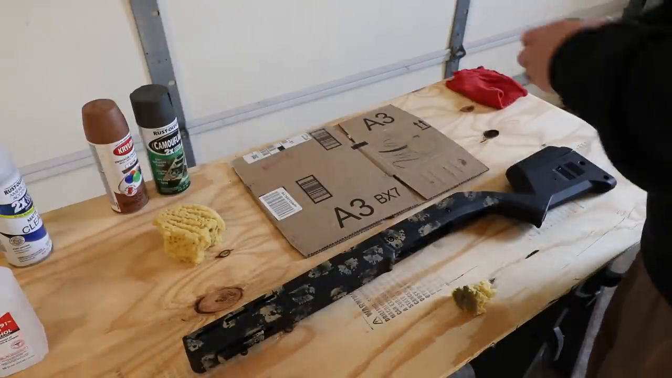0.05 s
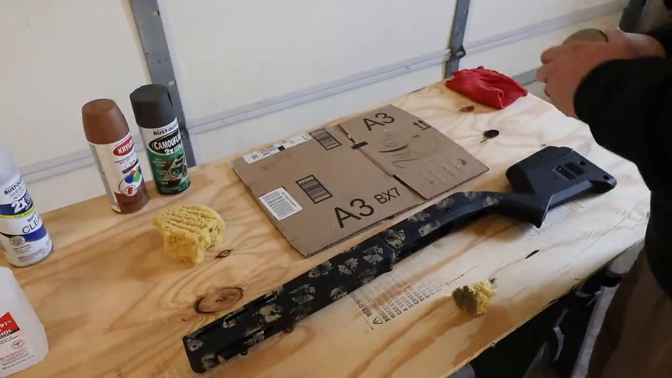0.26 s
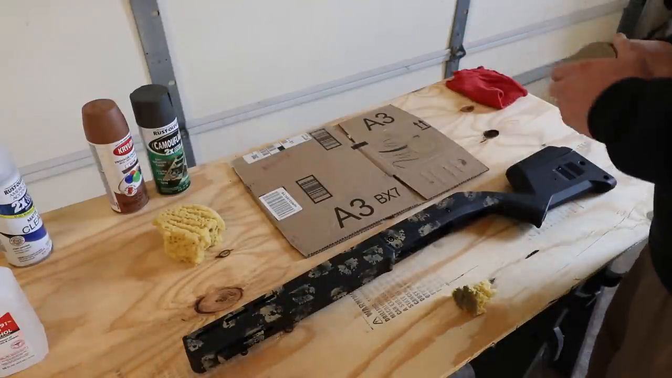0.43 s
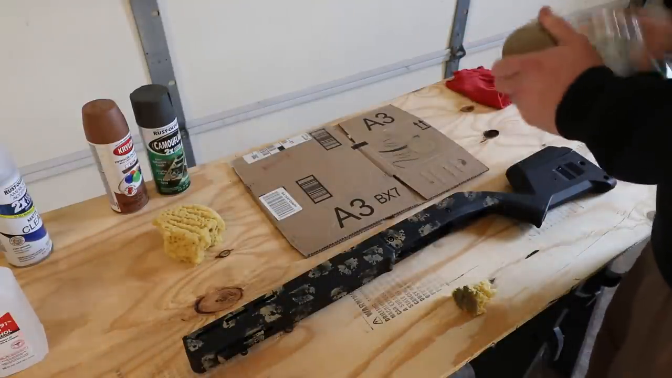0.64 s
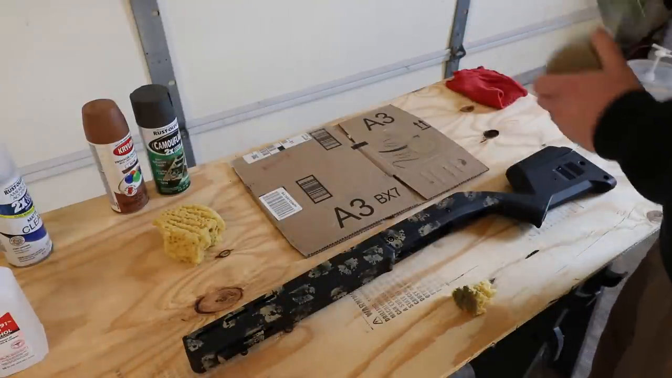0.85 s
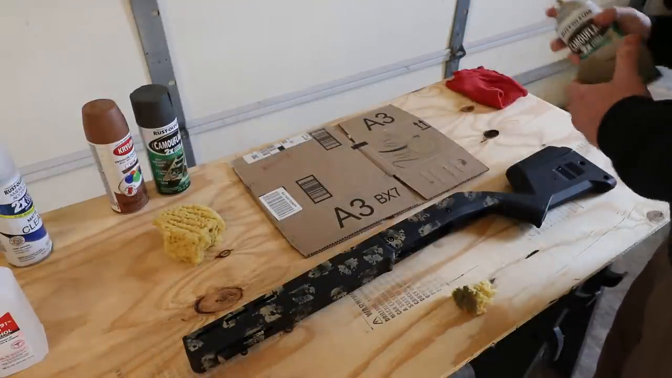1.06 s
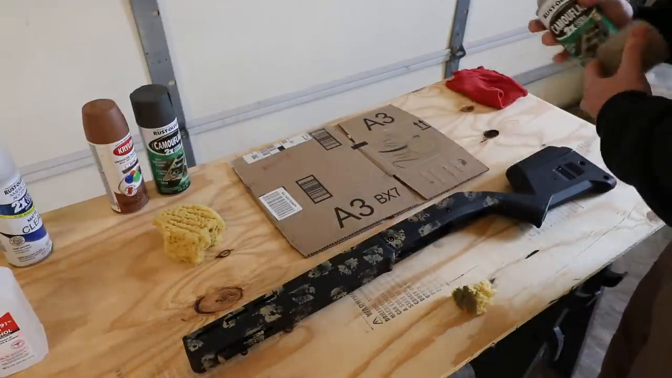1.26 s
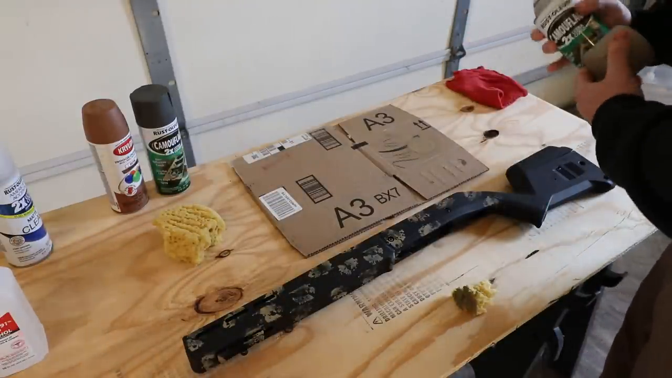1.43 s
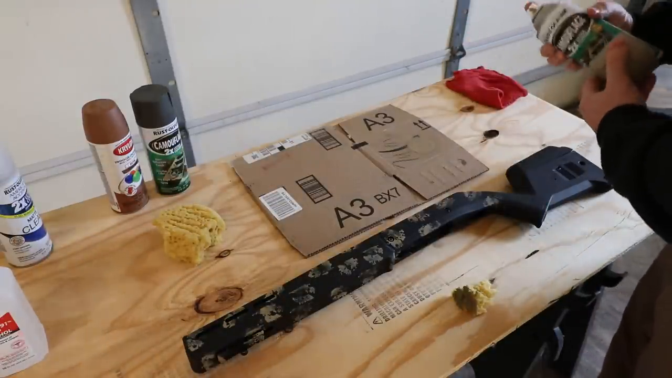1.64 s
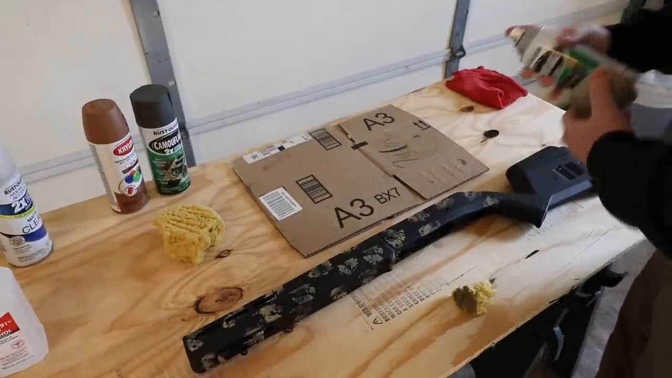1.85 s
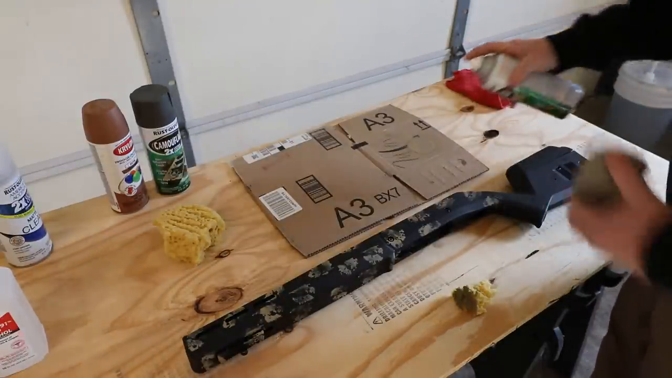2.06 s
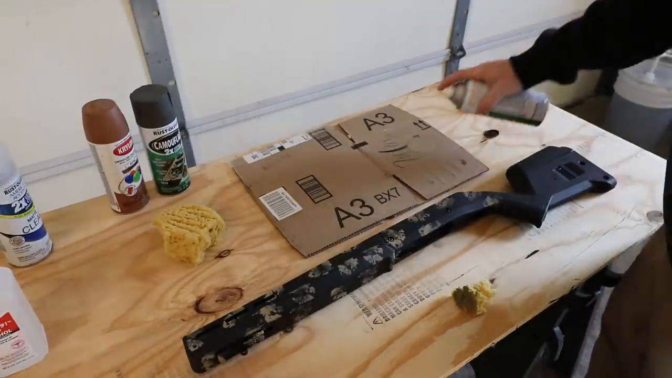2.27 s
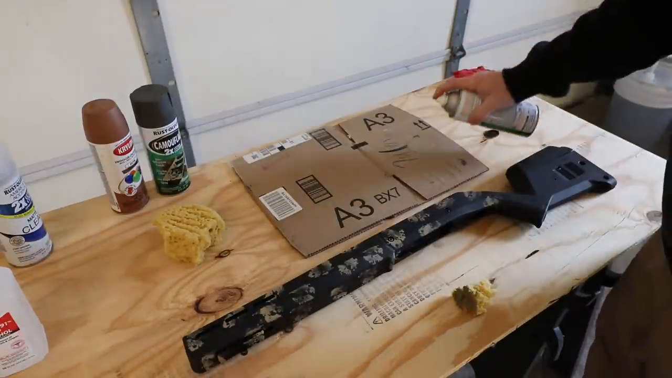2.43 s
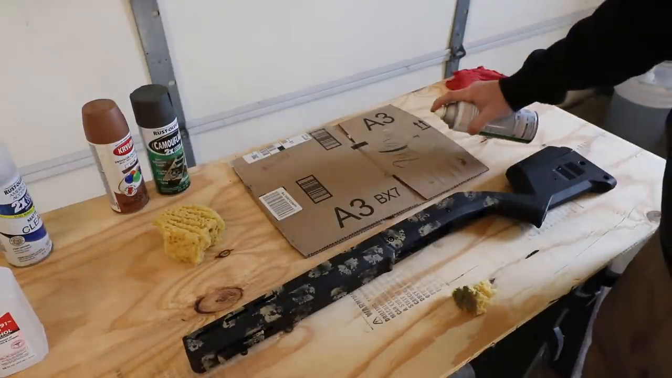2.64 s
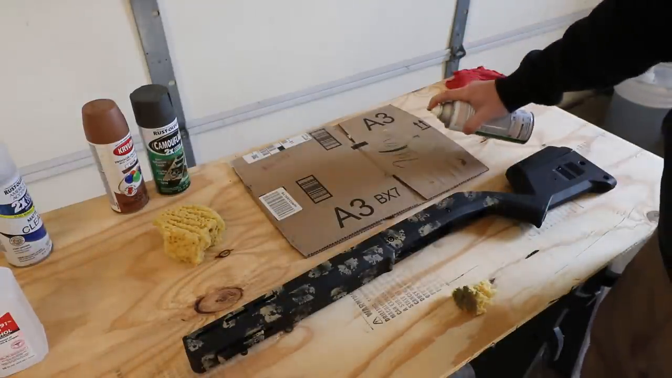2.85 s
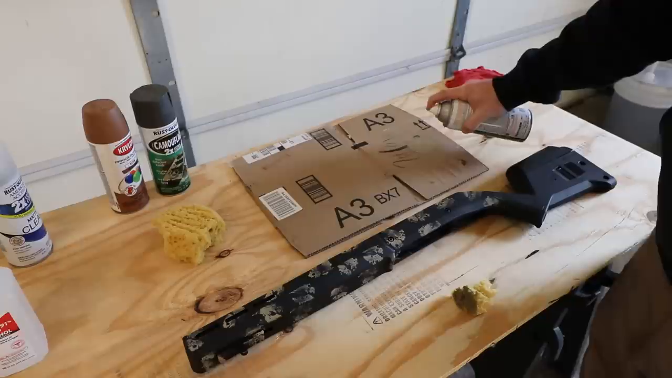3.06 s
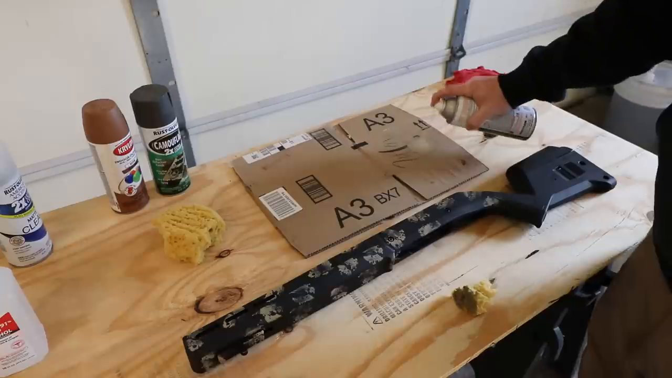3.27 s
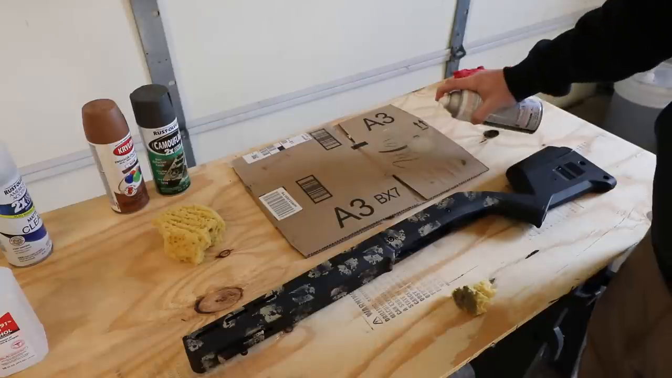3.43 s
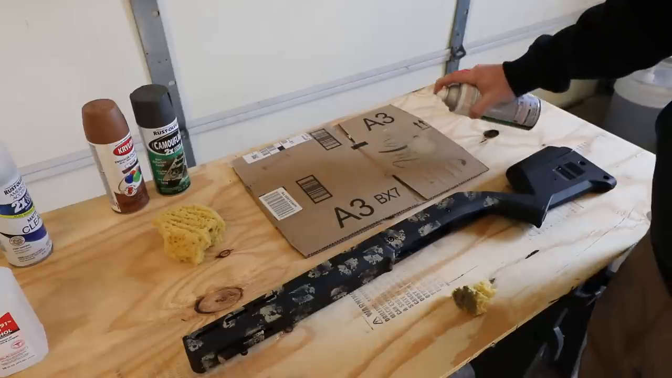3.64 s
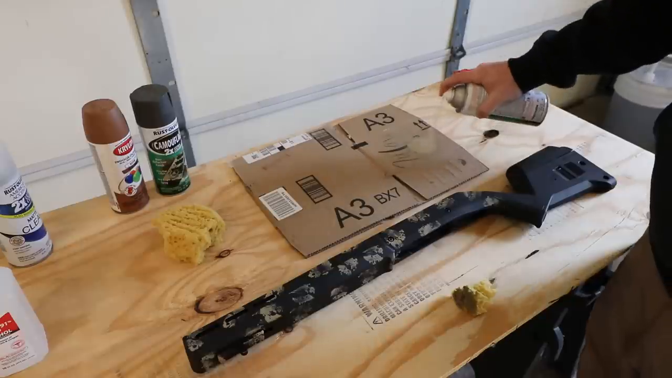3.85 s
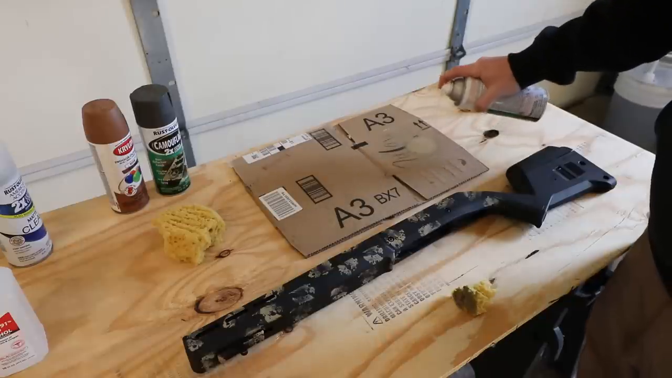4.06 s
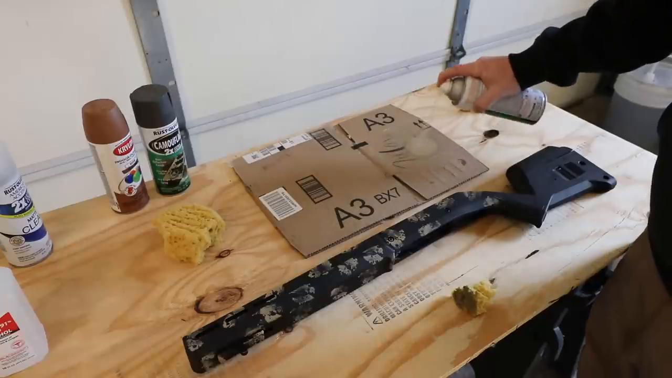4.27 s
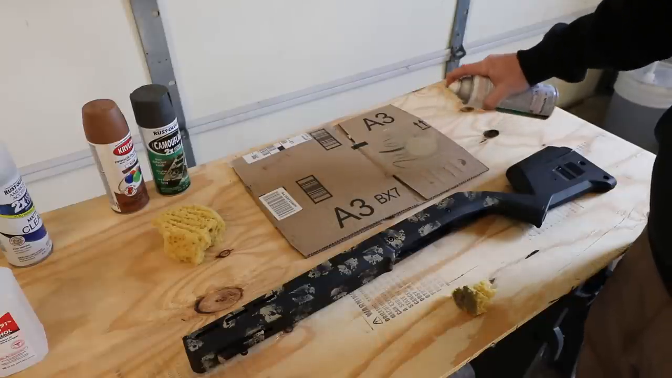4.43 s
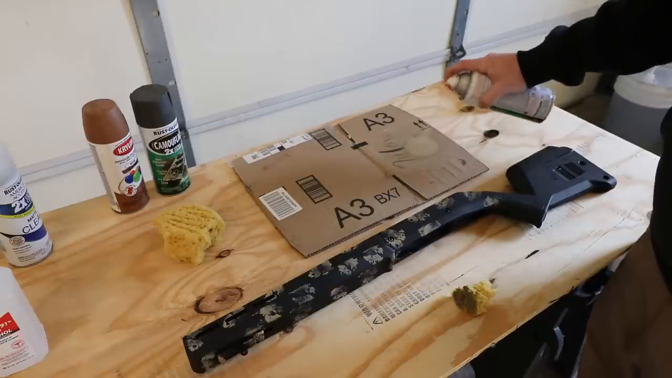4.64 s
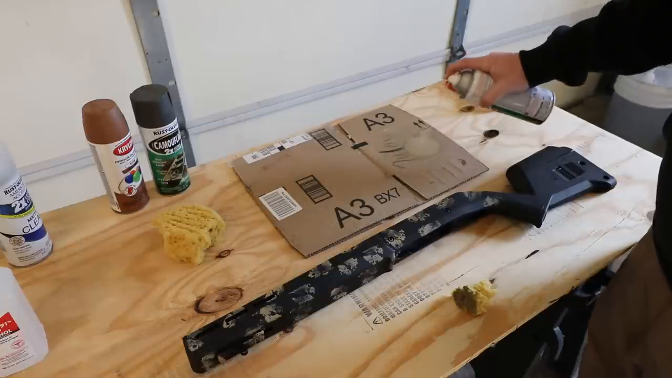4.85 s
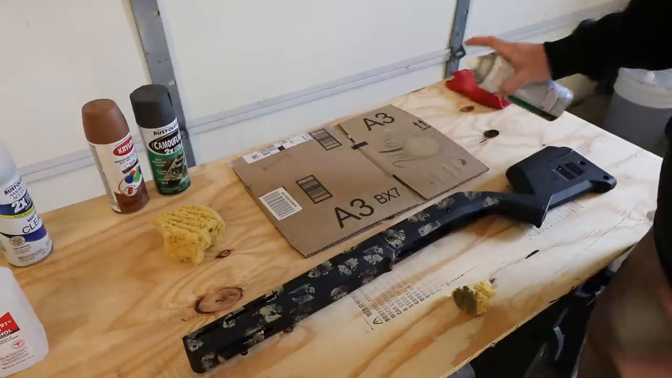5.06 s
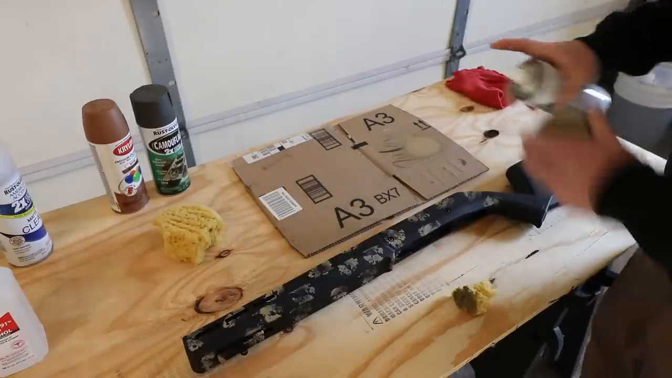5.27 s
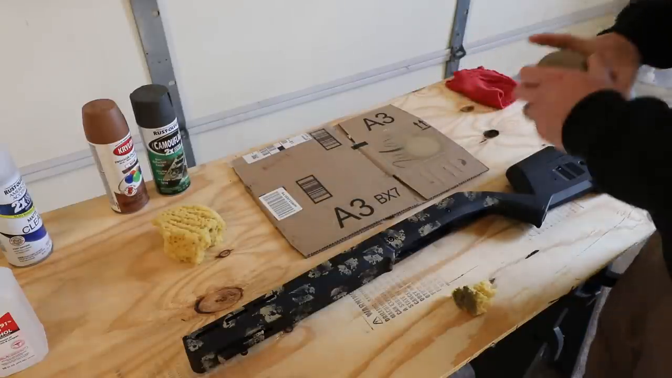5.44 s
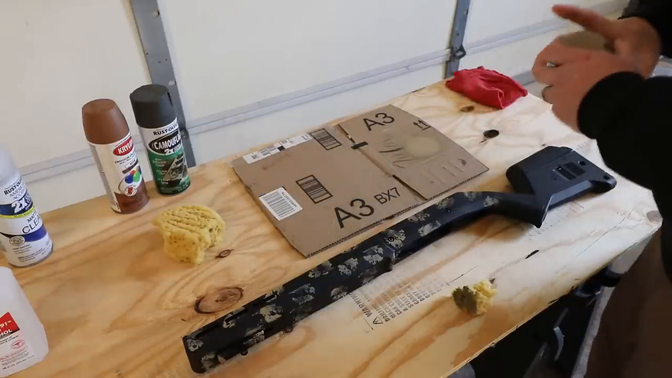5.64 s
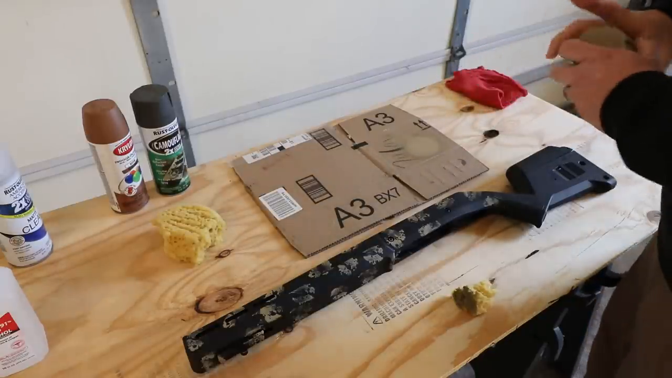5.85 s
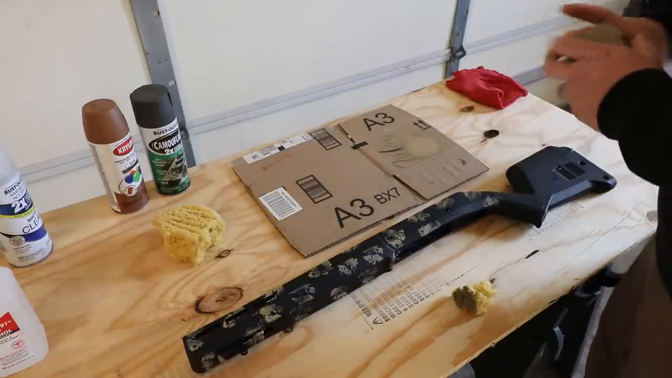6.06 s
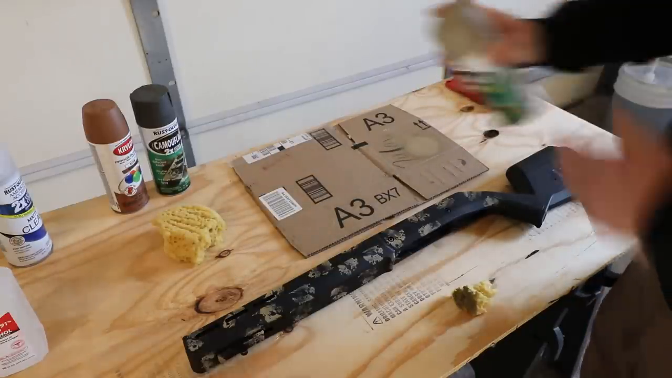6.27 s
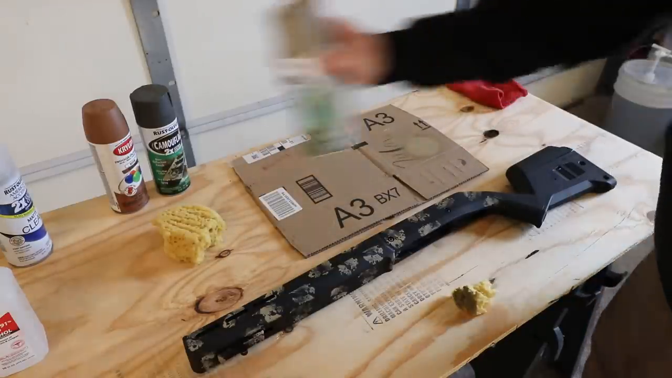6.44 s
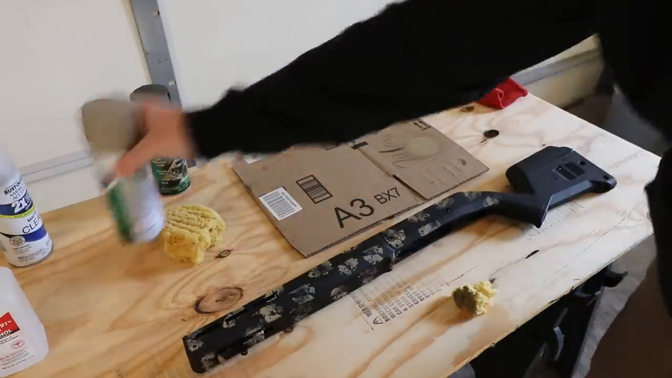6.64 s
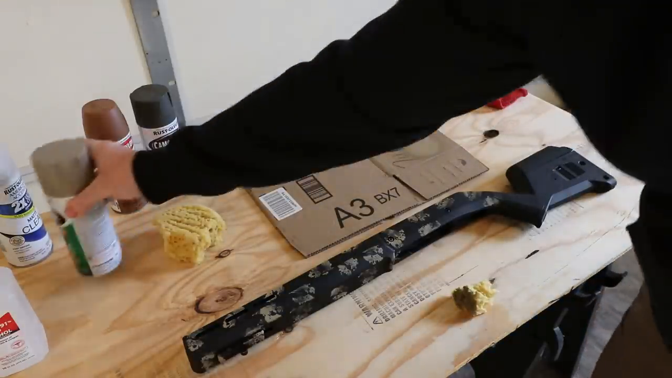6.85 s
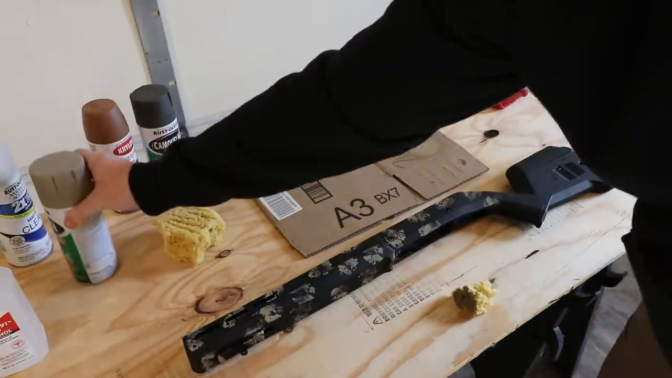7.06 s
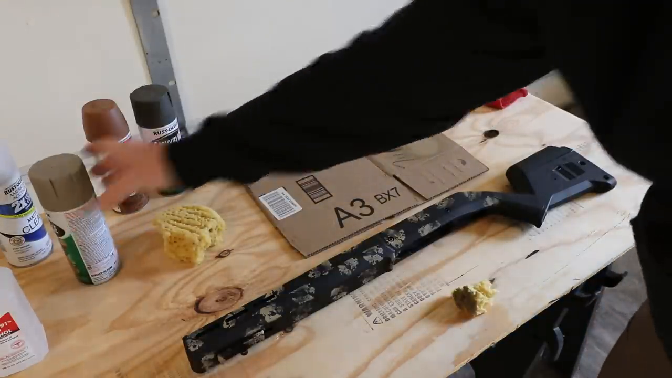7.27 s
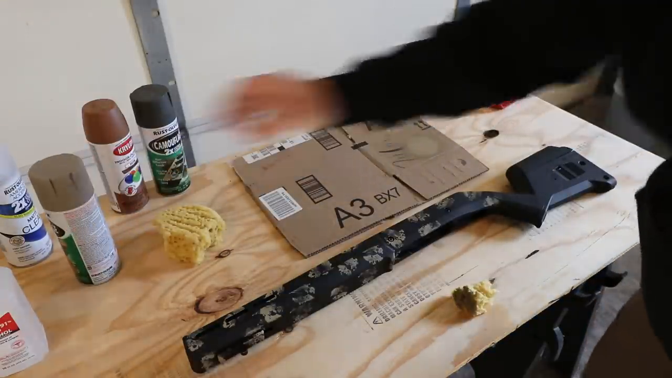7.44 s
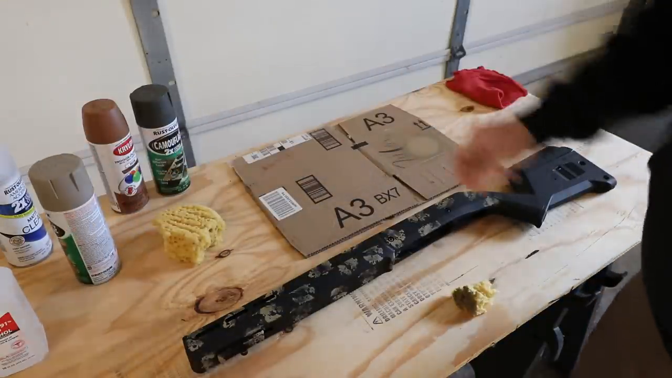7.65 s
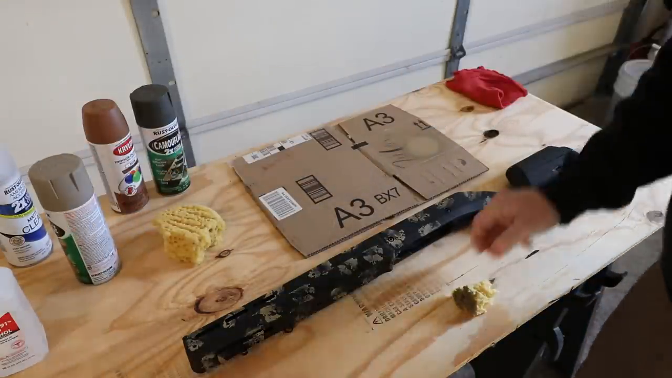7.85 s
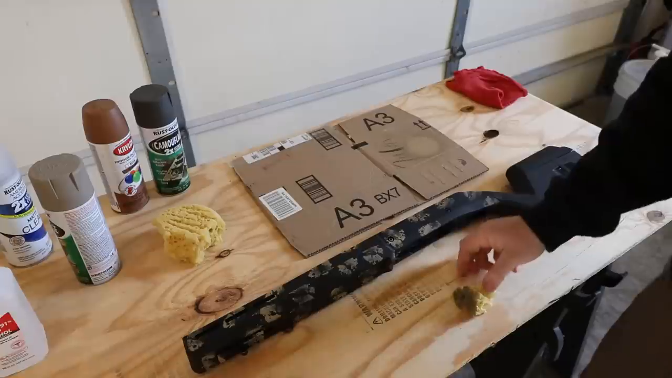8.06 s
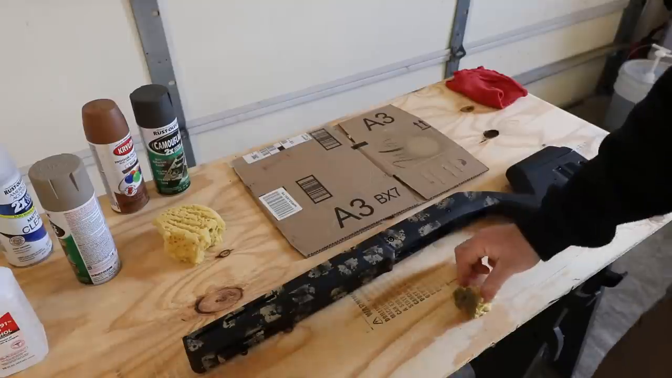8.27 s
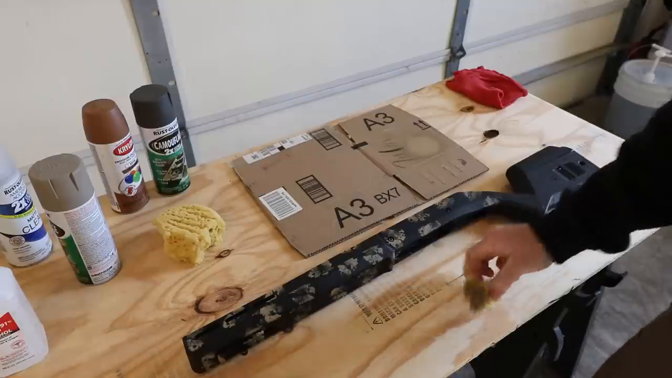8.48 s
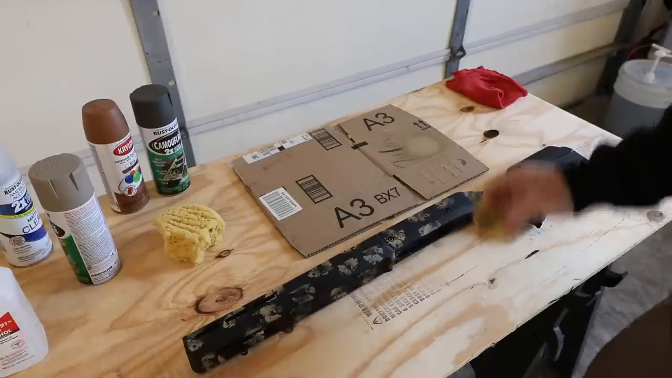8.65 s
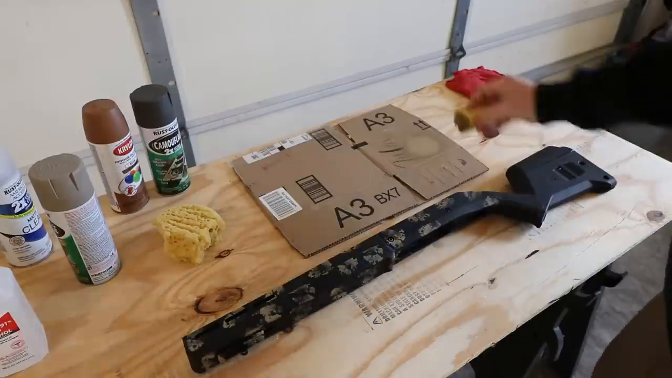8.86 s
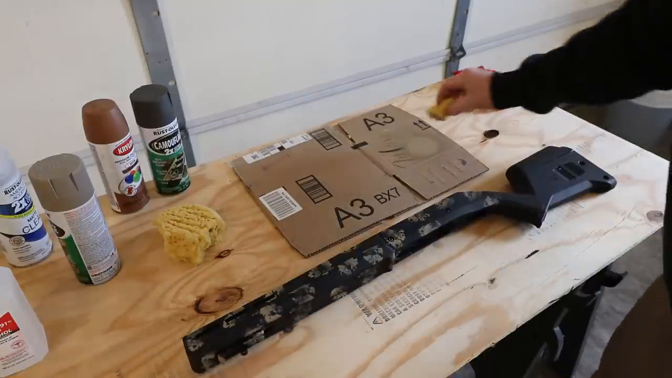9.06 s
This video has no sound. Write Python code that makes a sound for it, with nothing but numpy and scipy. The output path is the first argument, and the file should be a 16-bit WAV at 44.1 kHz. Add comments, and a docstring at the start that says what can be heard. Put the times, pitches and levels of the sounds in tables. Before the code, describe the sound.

Metal mixing ball clatters in a spray can, a plastic cap pops off, a steady hiss sprays, the cap snaps back, can knocks on wooden bench.

```python
"""First a faint rub and the clicks of the mixing ball in a spray paint can, close by at a wooden garage workbench.
The plastic cap is pried off, paint hisses onto cardboard with a swaying tone, the cap snaps back on, the bench is knocked.
Blows are sums of fading tones plus a burst of noise, and trapped air adds short hollow tones.
The jet, rubbing and quiet air are shaped noise. Echoes and a room tail surround the close sounds.
Loud knocks overload the microphone, and its limiter briefly turns the whole room down."""
import sys
import numpy as np
from scipy import signal
from scipy.fft import rfft, irfft, next_fast_len
from scipy.io import wavfile
from scipy.ndimage import uniform_filter1d

SR = 44100
rng = np.random.default_rng(int(sys.argv[2]) if len(sys.argv) > 2 else 0)


def wav_out(sig):
    """Save sig, one row per channel (or a flat mono array), as 16-bit PCM at SR to the path in sys.argv[1]."""
    wavfile.write(sys.argv[1], SR, np.round(np.clip(np.atleast_2d(sig).T, -1, 1) * 32767).astype(np.int16))


N = 401751  # length in samples

# Levels of single sounds are those before the room, the filters and the limiter.
# the quiet air of the garage, relative spectrum: f/Hz, level/dB
AIR_COLOUR = [(15, -57), (25, -7), (104, -3.5), (140, -6.5), (188, -6), (246, -10.5), (358, -7), (551, -15),
              (597, -11), (995, -18), (1410, -12.5), (1610, -20.5), (2170, -22), (3340, -23.5),
              (15400, -26)]
AIR_DB = -53.5
# hand, sleeve and sponge rubbing: middle t/s, length/s, level/dB, tilt/dB per octave
RUBS = [(.06, 0.14, -40.5, 1), (0.223, 0.12, -41.5, 3.5), (1.812, 0.42, -50.5, 3.5), (6.198, 0.054, -38, 9),
        (6.432, 0.026, -46, 5), (6.706, 0.24, -46, 4.5), (7.505, 0.19, -55, 16), (8.174, 0.057, -47, -1),
        (8.238, 0.18, -56.5, 1.5), (8.483, .045, -51, 3.5), (8.827, 0.041, -45, 4.5)]
# relative spectrum of rubbing before the tilt: f/Hz, level/dB
CLOTH_COLOUR = [(100, -11.0), (500, 6.5), (2500, 5.0), (3200, 2), (6000, -2.5), (8700, -2.5),
                (10500, -15.5), (16000, -23.5)]
# the painter shifts about with faint rustles: start t/s, end t/s
SHIFTS = [(5.3, 6.6), (6.85, 10.4), (8.55, 9)]
RUSTLE_GAP_S, RUSTLE_S, RUSTLE_DB, RUSTLE_TILT_DB = 0.12, .17, -59, .5  # tilt is per octave

# the ball hits the can wall: t/s, peak level/dB, favoured f/Hz, focus on that pitch/dB per octave
BALL_HITS = [(0.0476, -14, 1400, 5.5), (0.1879, -12, 1250, 0.5), (0.26, -19.5, 1300, 11),
             (0.2776, -14.5, 1490, 3), (0.7571, -9, 3300, 3.5), (0.8075, -10.5, 2450, -0.5),
             (.871, -19.5, 1750, 19), (1.0302, -4.5, 1120, 1.5), (1.055, -8.5, 1490, 1),
             (1.0736, 0, 3220, 10), (1.132, -16.5, 1415, 4), (1.285, -12, 3050, 2.5),
             (1.297, -12, 1290, 3.5), (1.438, -17.5, 1760, 1), (1.523, -14.5, 1930, 3),
             (1.5784, -23.5, 2000, 7), (1.619, -21.5, 2800, 5), (1.669, -25.5, 2100, 4.5),
             (1.8297, -23.5, 3080, 9), (2.472, -35.5, 3300, 5), (4.236, -24.5, 3420, 10),
             (4.56, -22, 3500, 10), (4.829, -24, 4300, 8), (5.2118, -35, 3520, 9)]
# the ball settles with faint ticks: start t/s, end t/s, first peak level/dB, last peak level/dB
SETTLING = [(1.74, 1.99, -36, -35), (2.27, 2.39, -41.5, -33.5)]
SETTLE_GAP_S, SETTLE_HZ, SETTLE_FOCUS_DB = .125, 3120, 5
REBOUND_S, REBOUND_DB = .007, -17  # typical delay of the one rebound, level relative to its hit
# ringing tones of the steel can: f/Hz, relative level/dB, time to fade by 60 dB/s
CAN_MODES = [(436, -22.5, .015), (756, -4, 0.02), (955, -1, 0.022), (1270, 3.5, 0.014), (1662, -2, 0.023),
             (1965, -4, .022), (2550, -25, .015), (3040, -1, 0.018), (3130, -5.5, 0.018),
             (3500, -16.5, 0.011), (4440, -5, 0.027), (6180, -5, 0.019), (6520, -8.5, 0.019),
             (7940, 3, 0.01), (8100, -17, .012)]
# noise burst of a ball or cap blow, relative spectrum: f/Hz, level/dB
CRACK_COLOUR = [(100, -25), (400, 2), (1200, 1.5), (3200, 7.5), (5500, -4.5), (8300, -0.5), (10000, -11),
                (16000, -15.5)]

# plastic snaps as the cap slips, pops off, cracks, is seated and locks, and as the nozzle is pressed:
# t/s, peak level/dB, favoured f/Hz, focus on that pitch/dB per octave
CAP_SNAPS = [(.3472, -7, 846, 4.5), (0.5826, 5.5, 1102, -2.5), (.971, 8.5, 4870, 13),
             (0.9727, 6.5, 5570, 10), (3.144, -41, 1700, 23), (5.6007, -1, 1350, 8.5),
             (5.6205, -6.5, 1500, 2.5), (5.902, 1.5, 7940, 4.5), (5.9031, 3.5, 1750, 7)]
# the cap drags over the rim in quick slips: start t/s, end t/s, first peak level/dB, last peak level/dB
DRAGS = [(.5662, .5795, -3, 0.5), (5.868, 5.8985, -34, -12)]
SLIP_GAP_S, SLIP_HZ, SLIP_FOCUS_DB = .0036, 2300, 3
# ringing tones of the plastic cap: f/Hz, relative level/dB, time to fade by 60 dB/s
CAP_MODES = [(612, -12.5, 0.0042), (1004, 8, 0.0042), (1650, 4, 0.0083), (2070, 0, 0.0091),
             (2810, -17, 0.016), (3820, -14, 0.002), (4250, -10.5, 0.017), (5390, 8, 0.0034),
             (7850, -6, 0.0035)]
# air under the cap rings as the rim lets go or closes: t/s, starting level/dB, f/Hz, time to fade by 60 dB/s
POPS = [(0.3473, -11.5, 476, 0.021), (0.569, 6.5, 405, 0.0045), (0.5821, 2.5, 1003, 0.02),
        (5.6001, 6, 985, 0.017), (5.9022, 0.5, 507, 0.014)]

VALVE_OPEN_S, VALVE_SHUT_S = 3.175, 5.088
OPENING_S, CLOSING_S = .012, 0.017  # how long each takes
# relative spectrum of the jet: f/Hz, level/dB
JET_COLOUR = [(300, -25), (1100, -20.5), (1550, -13.5), (2100, -15.5), (2750, -10), (3300, -15),
              (4400, -11), (5100, -6), (6200, -9), (7200, -1), (8400, 3.5), (9500, -6.5), (10700, -10),
              (13300, -3), (14700, -7), (16000, -7.5)]
JET_DB, SURGE_DB, SURGE_RISE_S, SURGE_S = -33, 4.5, 0.018, 0.31  # the jet swells above JET_DB, then sags
BODY_DB, SPIT_DB = 3.5, 4.5  # boost below about 5 kHz: all the time, and extra during the two spits
SPIT_DELAY_S, SPIT_S = 0.12, 0.059  # first spit peaks this long after opening; width of either spit
STROKE_S, FIRST_TURN_S = .3136, .2627  # hand swing: period, first far turn after opening
# extra path of the bounce: at first, added as the hand draws back, time for that, swing either way
DETOUR_M, RETREAT_M, RETREAT_S, SWING_M = .1003, .1158, 1.146, .0073
SOUND_M_PER_S = 343
BOUNCE, BEAM_HZ = .48, 6000  # gain factor; pitch above which the nozzle beams its hiss at the cardboard

# blows on the bench top: t/s, peak level/dB, favoured f/Hz, focus on that pitch/dB per octave
KNOCKS = [(7.201, 4.5, 389, 0.96), (7.2155, -4.5, 800, 2.8), (8.817, -36, 500, 1)]
# ringing tones of the bench top: f/Hz, relative level/dB, time to fade by 60 dB/s
BENCH_MODES = [(105, -18, 0.029), (126.4, -12, 0.2), (169.4, -13.5, 0.34), (223, -18.5, 0.032),
               (295, -5, 0.034), (413, -2, 0.029), (534, -1.5, 0.025), (670, -3, 0.016), (920, -2, 0.013),
               (1500, -13, 0.013)]
# noise burst of a bench blow, relative spectrum: f/Hz, level/dB
THUD_COLOUR = [(50, -17), (110, 0), (300, 13.5), (700, -12.5), (1550, -7), (2000, -19.5), (3200, -28),
               (5000, -42), (16000, -50)]

# time for the room tail to fade by 60 dB at each pitch: f/Hz, time/s
ROOM_T60 = [(100, 0.64), (320, 0.71), (900, 0.83), (2500, 0.84), (5000, 0.79), (9000, 0.6), (15000, 0.29)]
# relative spectrum at the start of the room tail: f/Hz, level/dB
ROOM_COLOUR = [(100, -4), (400, 1.5), (1000, 0.5), (3000, 3), (6000, 2), (9000, 0.5), (15000, 5)]
# echoes from bench and wall: typical delay/s, gain/factor (a minus flips the wave)
ECHOES = [(.0014, -0.17), (.0044, 0.38), (.0053, -0.2), (.0088, -0.11), (0.0132, -0.011), (0.02, 0.012)]
ATTACK_S, EDGE_HZ = .002, 15800  # limiter reaction time; the treble ends at this pitch


def amp(db):
    """Turns decibels into gain."""
    return 10 ** (np.asarray(db) / 20)


def unit(x):
    """Scales a sound to rms 1."""
    return x / np.sqrt(np.mean(x ** 2) + 1e-20)


def read(points, hz):
    """Reads a table between its points, with pitch on a logarithmic axis."""
    f, value = np.transpose(points)
    return np.interp(np.log(hz + 1), np.log(f + 1), value)


def octaves(hz, centre_hz):
    """Distance from a centre pitch in octaves, negative below it."""
    return np.log2((hz + 1) / centre_hz)


def add(mix, s, sound):
    """Mixes a sound in at time s."""
    part = mix[max(round(s * SR), 0):][:len(sound)]
    part += sound[:len(part)]


def placed(blows):
    """Lays (time, sound) pairs on the time line."""
    out = np.zeros(N)
    for s, blow in blows:
        add(out, s, blow)
    return out


def noise(colour, size):
    """Noise of rms 1, shaped by a function that gives dB for each pitch in Hz."""
    spectrum = rfft(rng.standard_normal(size))
    hz = np.fft.rfftfreq(size, 1 / SR)
    return unit(irfft(spectrum * amp(colour(hz)), size))


def run_of(start, end, gap_s, jitter=.2):
    """Nearly even times from start to end."""
    count = max(round((end - start) / gap_s), 1) + 1
    shift = jitter * gap_s * rng.uniform(-1, 1, count)
    return np.clip(np.linspace(start, end, count) + shift, start, end)


def ticks(runs, gap_s, pitch_hz, focus_db, scatter_db=1.5):
    """Runs of small blows whose strength glides from first to last, with some scatter."""
    rows = []
    for start, end, first_db, last_db in runs:
        for s in run_of(start, end, gap_s):
            glide_db = np.interp(s, (start, end), (first_db, last_db))
            rows.append((s, glide_db + scatter_db * rng.standard_normal(), pitch_hz, focus_db))
    return rows


def strikes(rows, modes, contact, contact_db, contact_t60, rise_s, detune, size):
    """Each blow rings the tones its contact point favours, with a burst of contact noise."""
    t = np.arange(size) / SR
    hz, db, t60 = np.transpose(modes)[:, :, None]
    sign = (-1) ** np.arange(len(modes))[:, None]
    decay = sign * amp(db - 60 * t / t60)
    rise = 1 - np.exp(-(t / rise_s) ** 2)  # softer surfaces take the force more slowly
    blows = []
    for s, peak_db, pitch_hz, focus in rows:
        def favour(f):
            return -focus * abs(octaves(f, pitch_hz))

        tuned = hz * (1 + detune * rng.standard_normal(hz.shape))
        ring = (decay * amp(favour(hz)) * np.sin(2 * np.pi * tuned * t)).sum(0)
        burst = noise(lambda f: read(contact, f) + favour(f), size) * amp(-60 * t / contact_t60)
        blow = (unit(ring) + amp(contact_db) * unit(burst)) * rise
        blows.append((s, amp(peak_db) * blow / abs(blow).max()))
    return blows


def garage(x, build_s=0.0016):
    """The dense room tail: noise that builds up quickly, then fades at its own rate for each pitch."""
    hz, t, z = signal.stft(rng.standard_normal(SR), SR, nperseg=256)
    fade_db = 60 * t / read(ROOM_T60, hz)[:, None]
    z = z * amp(read(ROOM_COLOUR, hz)[:, None] - fade_db)
    tail = signal.istft(z, SR, nperseg=256)[1][:SR]
    tail = tail * (1 - np.exp(-np.arange(SR) / SR / build_s))
    return signal.oaconvolve(x, tail / np.linalg.norm(tail))[:N]


def near_echoes(blows, spread=.22):
    """Bench top and wall repeat each blow within milliseconds; delays vary at random from blow to blow."""
    out = np.zeros(N)
    for s, blow in blows:
        for (delay, gain), shift in zip(ECHOES, rng.uniform(-1, 1, len(ECHOES))):
            add(out, s + delay * (1 + spread * shift), gain * blow)
    return out


def high_pass(x, edge_hz):
    """A small body cannot radiate long waves, so the lows are cut."""
    return signal.sosfilt(signal.butter(3, edge_hz, "high", fs=SR, output="sos"), x)


def in_room(source, rows, low_hz, wet_db, count):
    """A blow differs in each direction: the microphone gets one version, the room mixes count versions."""
    blows = source(rows)
    tail = sum(garage(placed(source(rows))) for _ in range(count)) / np.sqrt(count)
    return high_pass(placed(blows) + near_echoes(blows) + amp(wet_db) * tail, low_hz)


def quiet_air():
    """The steady background: shaped noise."""
    return amp(AIR_DB) * noise(lambda f: read(AIR_COLOUR, f), next_fast_len(N))[:N]


def rustles(scatter_db=2.0):
    """Faint overlapping rubs while the painter shifts about."""
    return [(s, RUSTLE_S, RUSTLE_DB + scatter_db * rng.standard_normal(), RUSTLE_TILT_DB)
            for start, end in SHIFTS for s in run_of(start, end, RUSTLE_GAP_S)]


def rubbing(grain_db=2.5):
    """Swells of grainy friction noise from skin, cloth and sponge."""
    out = np.zeros(N)
    t = np.arange(SR) / SR
    for s, length, db, tilt in RUBS + rustles():
        # the tilt stays level below 500 Hz
        hiss = noise(lambda f: read(CLOTH_COLOUR, f) + tilt * octaves(np.maximum(f, 500), 2000), SR)
        grain = amp(grain_db * unit(uniform_filter1d(rng.standard_normal(SR), size=120)))
        swell = np.sin(np.pi * np.minimum(t / length, 1))
        add(out, s - length / 2, amp(db) * unit(hiss * grain) * swell)
    return out


def ball_blows():
    """Lists each hit, its one weaker rebound, and the settling ticks."""
    rebounds = []
    for (s, peak_db, pitch_hz, focus), chance in zip(BALL_HITS, rng.uniform(.5, 1.5, len(BALL_HITS))):
        rebounds.append((s + chance * REBOUND_S, peak_db + REBOUND_DB, pitch_hz, focus))
    return BALL_HITS + rebounds + ticks(SETTLING, SETTLE_GAP_S, SETTLE_HZ, SETTLE_FOCUS_DB)


def ball(rows):
    """The mixing ball rings the steel wall, which paint and hand damp."""
    return strikes(rows, CAN_MODES, CRACK_COLOUR, contact_db=-0.5, contact_t60=0.011,
                   rise_s=.0001, detune=0.048, size=2048)


def cap(rows):
    """The plastic cap snaps on the can's rim with very short tones."""
    return strikes(rows, CAP_MODES, CRACK_COLOUR, contact_db=2.0, contact_t60=0.012,
                   rise_s=0.000084, detune=0.032, size=2048)


def pops(rows):
    """Air trapped in the cap rings as short hollow tones, each a fading sine."""
    t = np.arange(SR // 12) / SR
    return [(s, amp(db - 60 * t / t60) * np.sin(2 * np.pi * hz * t)) for s, db, hz, t60 in rows]


def detour(age):
    """Extra path in metres of the bounce: the hand draws back while it swings to and fro."""
    retreat = RETREAT_M * (1 - np.exp(-age / RETREAT_S))
    swing = SWING_M * np.cos(2 * np.pi * (age - FIRST_TURN_S) / STROKE_S)
    return DETOUR_M + retreat + swing


def spray(flutter_db=1.0):
    """Jet hiss that surges, sags and spits; its delayed bounce off the cardboard carves moving notches."""
    hz, t, z = signal.stft(rng.standard_normal(N), SR, nperseg=512, noverlap=384)
    hz, age = hz[:, None], np.maximum(t - VALVE_OPEN_S, 0)
    opening_spit = np.exp(-((age - SPIT_DELAY_S) / SPIT_S) ** 2)
    closing_spit = np.exp(-((t - VALVE_SHUT_S) / SPIT_S) ** 2)
    boost_db = BODY_DB + SPIT_DB * (opening_spit + closing_spit)
    flutter = unit(uniform_filter1d(rng.standard_normal(len(t)), size=4))
    colour_db = read(JET_COLOUR, hz) + boost_db / (1 + (hz / 5000) ** 4) + flutter_db * flutter

    path = detour(age)
    lag = 2 * np.pi * hz * path / SOUND_M_PER_S  # radians
    beam = 1 - .8 / (1 + (hz / BEAM_HZ) ** 10)
    bounce = beam * BOUNCE * np.sqrt(DETOUR_M / path)  # weaker as the hand draws back
    z = z * amp(colour_db) * (1 + bounce * np.exp(-1j * lag))
    hiss = unit(signal.istft(z, SR, nperseg=512, noverlap=384)[1][:N])

    now = np.arange(N) / SR
    opening = np.clip((now - VALVE_OPEN_S) / OPENING_S, 0, 1) ** 2
    closing = np.clip((VALVE_SHUT_S - now) / CLOSING_S, 0, 1)
    surge = (1 - np.exp(-age / SURGE_RISE_S)) / (1 + (age / SURGE_S) ** 6)
    return hiss * opening * closing * amp(JET_DB + SURGE_DB * np.interp(now, t, surge))


def bench(rows):
    """The plywood top rings low and long under the can and, at last, under the hand."""
    return strikes(rows, BENCH_MODES, THUD_COLOUR, contact_db=-0.5, contact_t60=0.037,
                   rise_s=0.0006, detune=0.0056, size=8192)


def scene(hiss_wet_db=-8, own_db=-74):
    """Mixes all sources in the garage; the two channels differ only by a trace of hiss."""
    snaps = CAP_SNAPS + ticks(DRAGS, SLIP_GAP_S, SLIP_HZ, SLIP_FOCUS_DB)
    hits = in_room(ball, ball_blows(), low_hz=280, wet_db=-5.5, count=2)
    hits += in_room(cap, snaps, low_hz=260, wet_db=-4.0, count=4)
    hits += in_room(pops, POPS, low_hz=348, wet_db=-6.5, count=1)
    hits += in_room(bench, KNOCKS, low_hz=85, wet_db=-1.5, count=3)
    hiss = rubbing() + spray()
    mono = hits + hiss + amp(hiss_wet_db) * garage(hiss) + quiet_air()
    return mono + amp(own_db) * rng.standard_normal((2, N))


def record(dry, threshold_db=-5, recovery_db_per_s=125, low_ceiling_db=0.9):
    """A limiter too slow for the first cycles, which clip lopsidedly; it recovers while the room rings."""
    over_db = np.maximum(20 * np.log10(abs(dry).max(0) + 1e-9) - threshold_db, 0)
    # hold each overshoot and let it fall at the recovery rate
    ramp = np.arange(N) / SR * recovery_db_per_s
    held_db = np.maximum.accumulate(over_db + ramp) - ramp
    # the gain follows with a short delay, so sudden peaks slip through
    keep = np.exp(-1 / (ATTACK_S * SR))
    limited = dry * amp(-signal.lfilter([1 - keep], [1, -keep], held_db))
    ceiling = np.where(limited < 0, amp(low_ceiling_db), 1)
    clipped = limited / (1 + (limited / ceiling) ** 12) ** (1 / 12)
    low_pass = signal.firwin(511, EDGE_HZ, window=("kaiser", 9), fs=SR)
    return signal.oaconvolve(clipped, low_pass[None], "same", axes=1)


dry = scene()
out = record(dry)
wav_out(out)
```